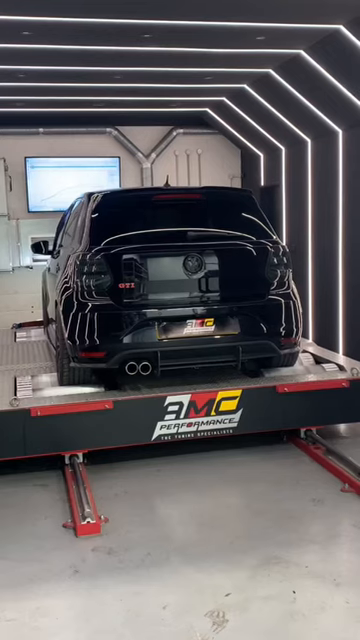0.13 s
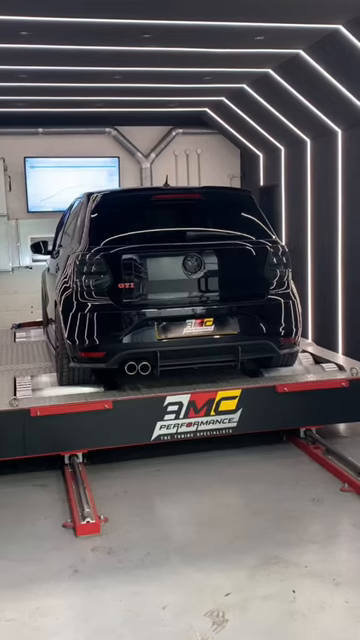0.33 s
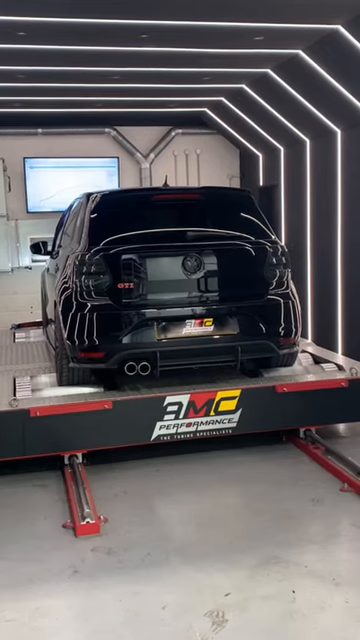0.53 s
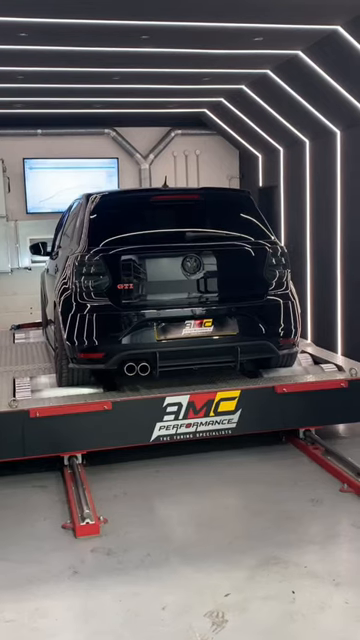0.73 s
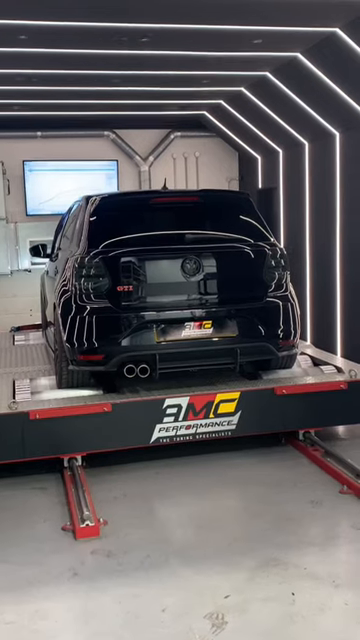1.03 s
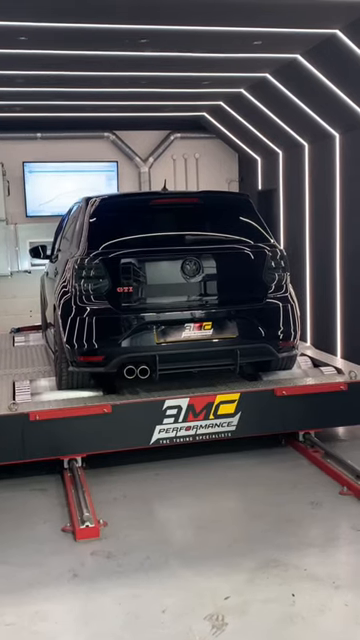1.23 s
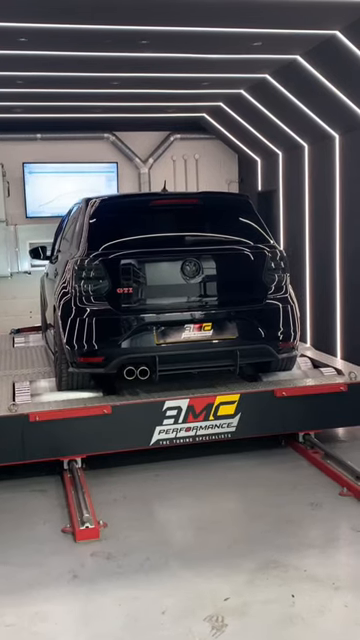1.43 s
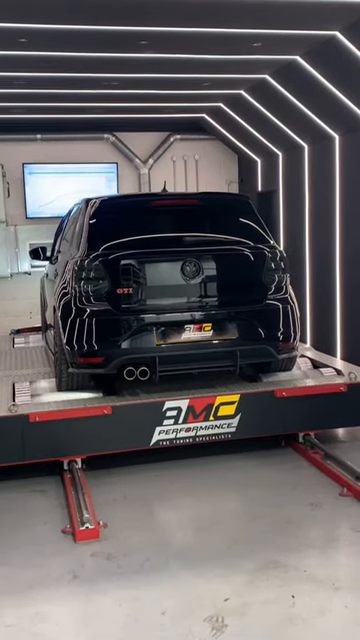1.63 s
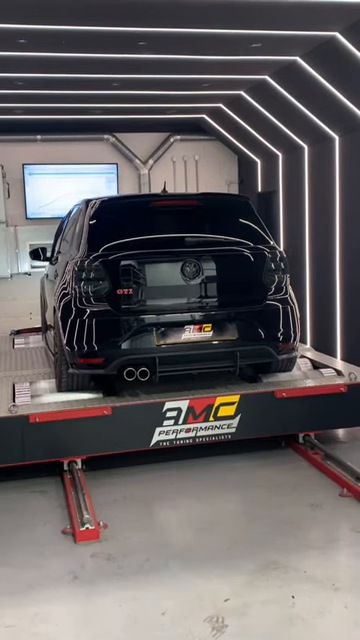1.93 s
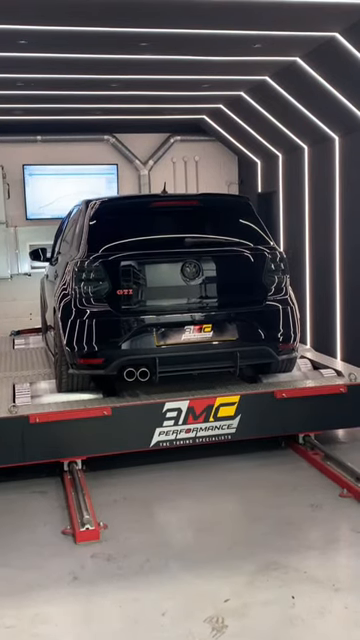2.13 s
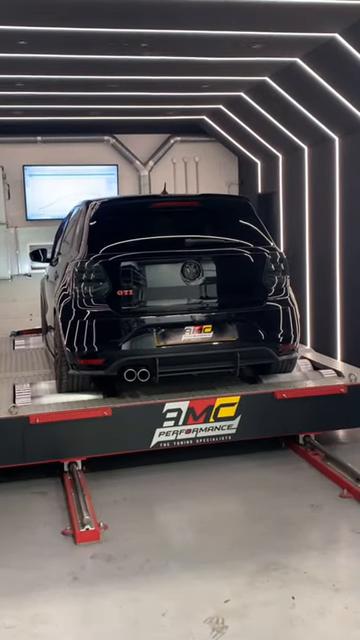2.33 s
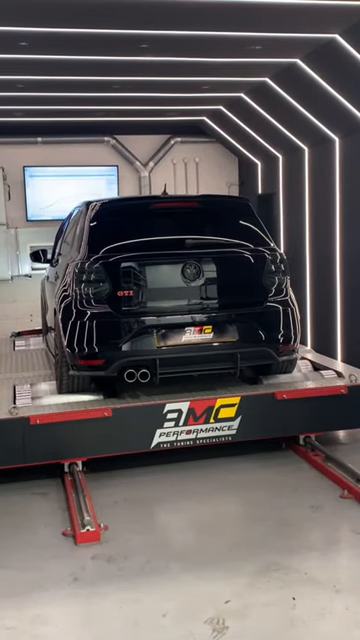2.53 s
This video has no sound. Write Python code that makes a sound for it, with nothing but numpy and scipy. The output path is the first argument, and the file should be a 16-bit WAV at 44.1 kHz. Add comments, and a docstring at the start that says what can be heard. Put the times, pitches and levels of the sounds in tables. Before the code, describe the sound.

A car engine revs through three gears in a booth, with sharp exhaust cracks and thuds.

```python
"""A small four-cylinder car pulls through three gears on a roller bench in a hard-walled booth, heard
from behind. From the start the rollers rumble, and each firing sounds through the tailpipe and the
booth's standing waves, snaps and spits a hiss. The pitch climbs, then drops at gear changes near 0.45 s
and 1.5 s, where the firing turns ragged and unburnt fuel thuds and cracks in the pipe; between them a
few single firings snap extra loudly. In the last gear the note rises again, more quietly."""
import sys
import numpy as np
from scipy import signal
from scipy.fft import rfft, irfft, next_fast_len
from scipy.io import wavfile
from scipy.ndimage import uniform_filter1d, map_coordinates

SR = 44100
rng = np.random.default_rng(int(sys.argv[2]) if len(sys.argv) > 2 else 0)


def pcm_store(signal):
    """Save signal as 16-bit PCM."""
    levels = np.round(np.clip(np.atleast_2d(signal), -1, 1) * 32767)
    wavfile.write(sys.argv[1], SR, levels.astype(np.int16).T)


N = 119070
T = np.arange(N) / SR
# Engine load. Each row: time in seconds, then gains in dB of the exhaust note, the roar and the hiss.
ENGINE_LOAD = [(0.04, -22, -27, -34), (0.22, -22, -25.5, -36.5), (0.33, -12.5, -22, -33),
               (0.43, -17.5, -17.5, -24.5), (0.65, -19.5, -22.5, -30.5), (0.68, -13.5, -18, -23.5),
               (0.81, -14.5, -21.5, -27), (0.94, -16, -25.5, -28.5), (1.02, -23.5, -26, -29),
               (1.08, -23, -25.5, -28.5), (1.11, -23.5, -25, -30), (1.3, -25, -28.5, -37.5),
               (1.45, -26, -36, -43.5), (1.49, -17, -29.5, -37), (1.51, -22, -31.5, -40),
               (1.52, -23.5, -19, -29), (1.58, -18.5, -23, -26.5), (1.62, -21.5, -24, -28.5),
               (1.77, -22, -28.5, -35), (1.91, -24, -32, -40.5), (2.0, -26.5, -32, -37),
               (2.16, -24.5, -29, -38.5), (2.22, -21, -33.5, -43), (2.38, -24.5, -37, -42),
               (2.7, -28.5, -37.5, -44)]


def engine():
    """Phase locking: all parts of the exhaust sound follow one running count of firings."""
    # Each row: time in seconds, firings per second, raggedness from 0 to 1.
    speed = [(.04, 124, 0.52), (.2, 131, 0.76), (.33, 140, 0.2), (.44, 143.4, 0.85), (.455, 105, 0.82),
             (.52, 106, 1), (.63, 92, 0.8), (.67, 108, 0.25), (.9, 108.7, 0), (1.05, 111.3, 0.62),
             (1.19, 115.4, 0.66), (1.4, 115, 0.38), (1.5, 121.5, 0), (1.518, 109, 1), (1.65, 94.2, 0.56),
             (1.7, 89.5, 0.27), (1.9, 93, 0.33), (2.22, 95, 0.06), (2.45, 101, 0.02), (2.6, 104, 0),
             (2.7, 107.6, 0.25)]
    rate, ragged = curves(speed)
    firings = np.cumsum(rate) / SR
    scatter = rng.standard_normal((2, 600))  # two random values per firing
    strength = amp(1.1 * map_coordinates(scatter[0], [firings], order=1))  # cylinders fire unevenly
    note = exhaust_note(firings, strength, ragged)
    return note + strength * (drone(firings) + flares(firings)) + exhaust_noise(firings, rate, scatter)


def exhaust_note(firings, strength, ragged):
    """Source and filter: harmonics, giving way to noise when ragged, drive the pipe and the booth."""
    # Relative levels in dB of harmonics 3 to 10 of the firing rate.
    harmonics_db = [4, 3.5, -3.5, -6.5, -10, -9, 2, -16]
    waver_db = lambda: 3 * map_coordinates(rng.standard_normal(40), [T * 9])  # 9 values a second
    harmonics = sum(amp(db + waver_db()) * np.cos(2 * np.pi * k * firings)
                    for k, db in enumerate(harmonics_db, 3))
    rough = unit(filtered(rng.standard_normal(N), lambda hz: (hz > 150) & (hz < 1100)))
    source = np.sqrt(1 - ragged) * unit(strength * harmonics) + (np.sqrt(ragged) + amp(-4)) * rough
    level_db = curves(ENGINE_LOAD)[0] - 8 * (1 - ragged)  # even firing is softer
    return amp(level_db) * levelled(filtered(source, standing_waves))


def standing_waves(hz):
    """Modal superposition: resonances of the pipe and the booth add with alternating sign."""
    # Each row: frequency in Hz, bandwidth in Hz, gain in dB.
    modes = [(278.3, 44, 0.5), (320.4, 2.8, 5.5), (339.8, 8.4, 3), (421, 21, 0), (445.5, 13.8, 3.5),
             (463, 8, 4.5), (506, 34, -1), (577.3, 27, 0), (644.8, 5.6, 7), (716, 14, -2.5),
             (776.4, 47, -1.5), (975.6, 11.3, -5)]
    return sum((-1) ** k * amp(db) * 1j * hz * width / (centre ** 2 - hz ** 2 + 1j * hz * width)
               for k, (centre, width, db) in enumerate(modes))


def drone(firings):
    """Periodic excitation: the firing rate and its octave sound as two low tones."""
    # Each row: time in seconds, level of the fundamental in dB, level of the octave in dB.
    levels = [(.04, -26, -24.5), (.2, -30.5, -25.5), (.33, -31, -14.5), (.43, -25, -20.5),
              (.455, -41, -21.5), (.52, -38, -23.5), (.56, -38, -50), (.655, -39, -26), (.68, -26, -20),
              (.78, -40, -21), (.95, -35, -25), (1.02, -35, -31), (1.15, -39, -33), (1.27, -51, -31.5),
              (1.45, -39, -40.5), (1.52, -36, -28), (1.66, -51, -33.5), (1.75, -45.5, -40.5),
              (1.9, -61.5, -31), (2.07, -43.5, -35.5), (2.31, -40.5, -52), (2.42, -37, -34.5),
              (2.6, -38.5, -30), (2.7, -48, -22)]
    return sum(amp(db) * np.sqrt(2) * np.cos(2 * np.pi * k * firings)
               for k, db in enumerate(curves(levels), 1))


def flares(firings):
    """Resonance: over each listed span an overtone stands out, as on meeting a standing wave."""
    # Each row: start in seconds, end in seconds, multiple of the firing rate, level in dB.
    spans = [(0.038, 0.173, 4, -33), (0.174, 0.3, 4, -26), (0.296, 0.444, 7, -28.5),
             (0.342, 0.453, 3, -18.5), (0.392, 0.448, 3, -11), (0.348, 0.464, 5, -24),
             (0.675, 0.958, 3, -25.5), (0.667, 0.754, 4, -20.5), (0.697, 1.056, 6, -21.5),
             (0.717, 0.944, 5, -29.5), (0.707, 1.05, 5.5, -39), (0.704, 0.857, 8, -30.5),
             (0.783, 1.02, 4, -25.5), (0.798, 1.028, 9, -30), (0.901, 1.02, 7, -28),
             (1.019, 1.125, 4, -16.5), (1.087, 1.271, 3, -30), (1.104, 1.26, 4, -24),
             (1.65, 2.335, 3, -36.5), (1.77, 1.99, 5, -29.5), (1.947, 2.186, 7, -35),
             (2.054, 2.146, 6, -29.5), (2.403, 2.719, 3, -41)]
    fade = lambda s: np.clip(s / .045, 0, 1)
    return sum(amp(db) * fade(T - start) * fade(end - T) * np.sqrt(2) * np.cos(2 * np.pi * k * firings)
               for start, end, k, db in spans)


def exhaust_noise(firings, rate, scatter):
    """Amplitude modulation: roar and hiss spit at each firing, whose sharp front adds a snap."""
    # Spectra of roar, hiss, topmost hiss and snap. Each row: frequency in Hz, relative level in dB.
    roar_spectrum = [(300, -22.5), (460, -11.5), (800, -8.5), (1250, -10.5), (1430, -3.5), (1700, -7),
                     (2200, -9.5), (3000, -11.5), (4000, -9.5), (6000, -38), (9000, -57)]
    hiss_spectrum = [(3700, -1.5), (6500, 4.5), (9000, -2.5), (12000, -9), (15900, -9.5)]
    air_spectrum = [(10000, 8), (16000, -7)]
    snap_spectrum = [(1200, -4), (4000, 4), (6000, -10), (10000, -1.5), (16000, -20)]
    # Each row: time in seconds, level of the snaps over the hiss in dB.
    snap_levels = [(.04, -25), (.6, -23), (.67, -19), (.9, 2), (1.1, 1.5), (1.25, -6), (1.7, -21),
                   (1.85, -7), (2.15, -16), (2.3, -21)]
    lag_s, decay_s, scatter_db = .0043, .001, 3
    roar_share, hiss_share = .11, .067  # weight of the spits against the steady noise
    _, roar_db, hiss_db = curves(ENGINE_LOAD)
    lagged = firings - lag_s * rate
    snap_size, spit_size = amp(scatter_db * scatter[:, lagged.astype(int)])
    spits = unit(spit_size * np.exp(-(lagged % 1) / rate / decay_s))
    spitting = lambda share: (np.sqrt(1 - share) + np.sqrt(share) * spits) * rng.standard_normal(N)
    roar = levelled(coloured(spitting(roar_share), roar_spectrum))
    hiss = levelled(coloured(spitting(hiss_share), hiss_spectrum))
    fronts = np.diff(np.floor(lagged), prepend=0) * snap_size
    snap = amp(curves(snap_levels)[0]) * unit(coloured(fronts, snap_spectrum))
    air_db = -4.5 + .73 * (hiss_db - hiss_db.max())  # the topmost hiss fades faster than the rest
    air = amp(air_db) * unit(coloured(spitting(hiss_share), air_spectrum))
    return amp(roar_db) * roar + amp(hiss_db) * (hiss + snap + air)


def thuds_and_cracks():
    """Impulsive excitation: damped thuds sink in pitch, and sharp cracks echo off the walls."""
    # Each row: start in seconds, gain in dB.
    thud_events = [(0.438, -11.5), (.55, -11), (.661, -6.5), (.774, -13), (0.985, -15), (1.524, -0.5),
                   (1.565, -7), (1.61, -4.5), (1.64, -14)]
    crack_events = [(0.4288, -17), (0.456, -18), (.476, -10), (.507, -5.5), (.5225, -8), (0.537, -10),
                    (0.5552, -8), (.571, -8), (.623, -4), (.6397, -17), (.658, -10), (.667, -3),
                    (1.0596, -17), (0.9422, -4), (1.4881, -11), (1.5214, -0.5), (1.538, -8), (1.556, -4),
                    (1.577, -5)]  # backfires around the gear changes, and a few loud single firings
    # Each row: frequency in Hz, gain of the cracks in dB.
    crack_spectrum = [(300, -3), (1500, 0), (9000, 0), (16000, -3)]
    thud_hz, excess, sink_s = 53.8, 4.5, .0075  # the pitch sinks from (1 + excess) times thud_hz
    attack_s, thud_t60_s, fizz_t60_s = .012, .15, .02
    thuds, cracks, t = np.zeros(N + SR), np.zeros(N + SR), T[:SR // 2]
    cycles = thud_hz * (t + excess * sink_s * (1 - np.exp(-t / sink_s)))
    envelope = amp(-60 * t / thud_t60_s) * (1 - np.exp(-t / attack_s)) ** 2
    for start, db in thud_events:
        thuds[round(start * SR):][:len(t)] += amp(db) * envelope * np.sin(2 * np.pi * cycles)
    spike = 2 * (t == 0)
    for start, db in crack_events:
        fizz = amp(-10 - 60 * t / fizz_t60_s) * rng.standard_normal(len(t))
        cracks[round(start * SR):][:len(t)] += amp(db) * (spike + fizz)
    cracks = coloured(cracks[:N], crack_spectrum)
    grit = unit(filtered(rng.standard_normal(N), lambda hz: hz < 250))
    return thuds[:N] * (1 + .3 * grit) + cracks + amp(-6) * walls(cracks, t60_s=.3)


def rollers():
    """Band-limited noise: the rollers rumble 25 dB under the roar, following the load."""
    # Each row: frequency in Hz, relative level in dB.
    spectrum = [(25, -12), (45, 7), (70, 11), (250, 5), (400, -24)]
    return amp(curves(ENGINE_LOAD)[1] - 25) * unit(coloured(rng.standard_normal(N), spectrum))


def walls(x, t60_s):
    """Diffuse reverberation: reflections merge into an exponentially decaying noise tail."""
    t = T[:SR // 2]
    tail = rng.standard_normal(len(t)) * amp(-60 * t / t60_s)
    return signal.fftconvolve(x, tail / np.linalg.norm(tail))[:N]


def amp(db):
    """Decibels as an amplitude ratio."""
    return 10 ** (np.asarray(db) / 20)


def unit(x):
    """Normalisation to an RMS of one."""
    return x / np.sqrt(np.mean(x ** 2) + 1e-20)


def levelled(x):
    """Normalisation by the running RMS over 0.1 s."""
    return x / np.sqrt(np.abs(uniform_filter1d(x ** 2, size=SR // 10)) + 1e-12)


def along(points, hz):
    """Interpolation on a logarithmic frequency axis."""
    frequencies, values = np.transpose(points)
    return np.interp(np.log(hz + 1), np.log(frequencies + 1), values)


def curves(rows):
    """Linear interpolation in time of each column after the first."""
    times, *columns = np.transpose(rows)
    return [np.interp(T, times, column) for column in columns]


def filtered(x, response):
    """Linear filtering by a complex frequency response."""
    size = next_fast_len(N + SR // 2)
    return irfft(rfft(x, size) * response(np.fft.rfftfreq(size, 1 / SR)), size)[..., :N]


def coloured(x, spectrum):
    """Spectral shaping, falling to -70 dB two octaves below the first point."""
    points = [(spectrum[0][0] / 4, -70)] + list(spectrum)
    return filtered(x, lambda hz: amp(along(points, hz)))


def scene():
    """Partial coherence: left and right share the direct sound and take scattered sound in antiphase."""
    # Each row: frequency in Hz, left-right likeness from 0 to 1.
    likeness = [(60, 0.95), (250, 0.98), (600, 0.69), (2000, 0.23), (4500, .9), (12000, .88)]
    car = engine() + thuds_and_cracks() + rollers()
    angle = lambda hz: np.arccos(along(likeness, hz)) / 2
    direct = filtered(car, lambda hz: np.cos(angle(hz)))
    scattered = filtered(walls(car, t60_s=.15), lambda hz: np.sin(angle(hz)))
    return np.array([direct + scattered, direct - scattered])


def record(dry):
    """Phase and level differences set two microphone ports apart; the sound cuts in after a silence."""
    # Each row: frequency in Hz, phase lead of the left port in radians.
    phase_lead = [(0, 0), (1640, .8), (2240, 1.9), (4750, np.pi), (9000, 3 * np.pi), (13200, 5 * np.pi),
                  (17400, 7 * np.pi)]
    # Each row: frequency in Hz, left minus right level in dB.
    balance = [(60, 1.5), (150, 0.3), (300, 1), (600, -6), (1400, -3), (3000, -1.5), (6000, 0)]
    start_s, top_hz = .036, 15900
    half = np.array([[.5], [-.5]])
    phase = lambda hz: half * np.interp(hz, *np.transpose(phase_lead))
    ports = filtered(dry, lambda hz: amp(half * along(balance, hz)) * np.exp(1j * phase(hz)))
    onset = np.clip((T - start_s) * 1000, 0, 1)
    return filtered(ports * onset, lambda hz: hz < top_hz)


dry = scene()
out = record(dry)
pcm_store(out)
```